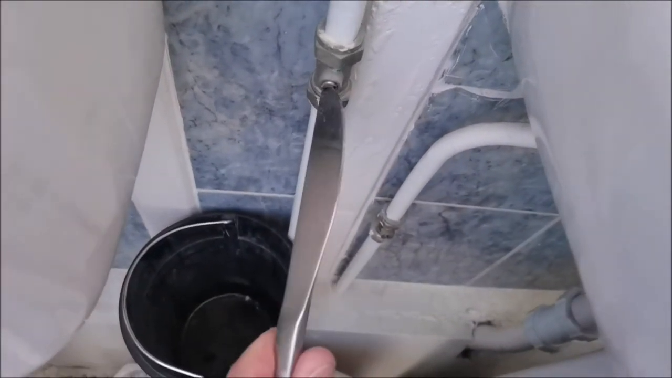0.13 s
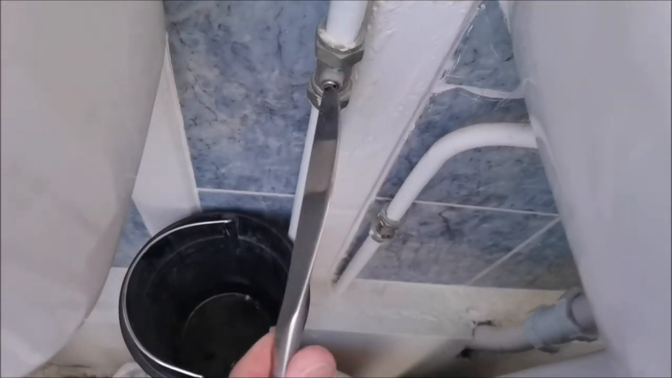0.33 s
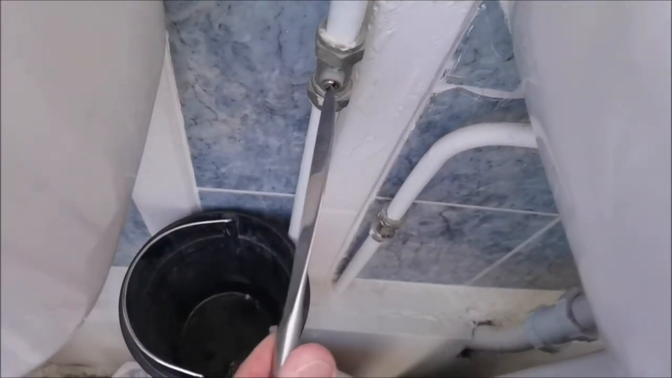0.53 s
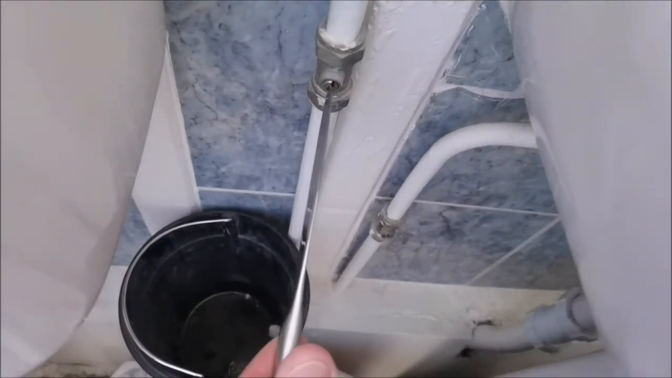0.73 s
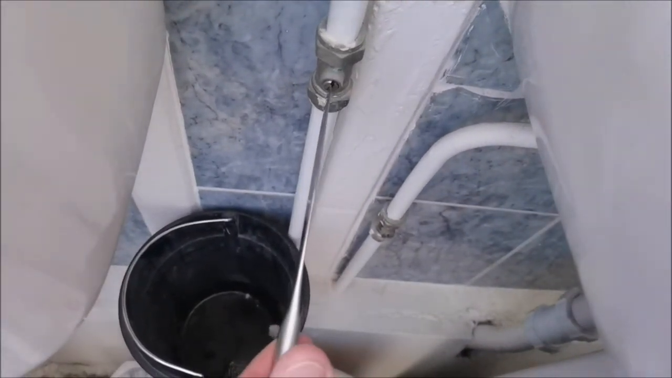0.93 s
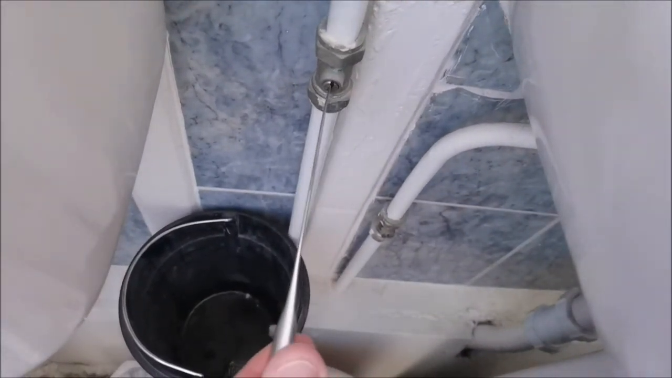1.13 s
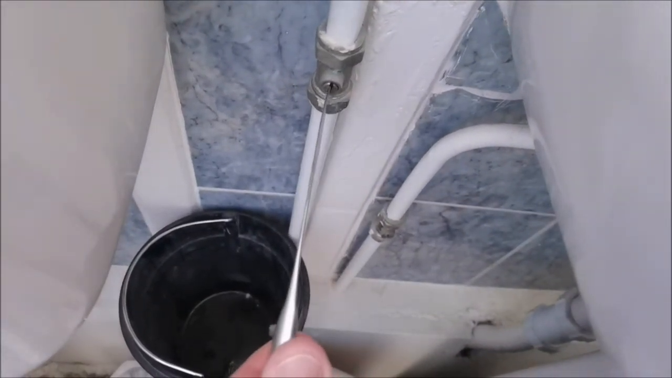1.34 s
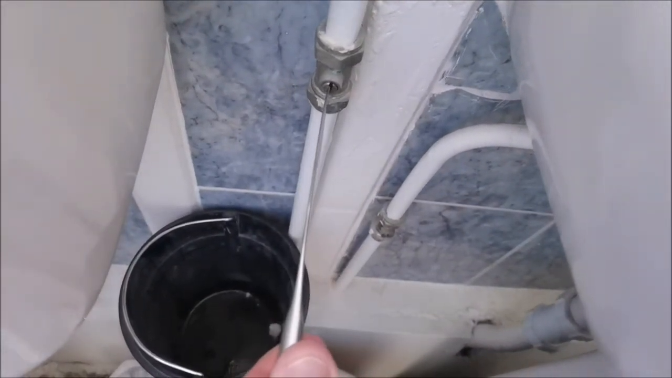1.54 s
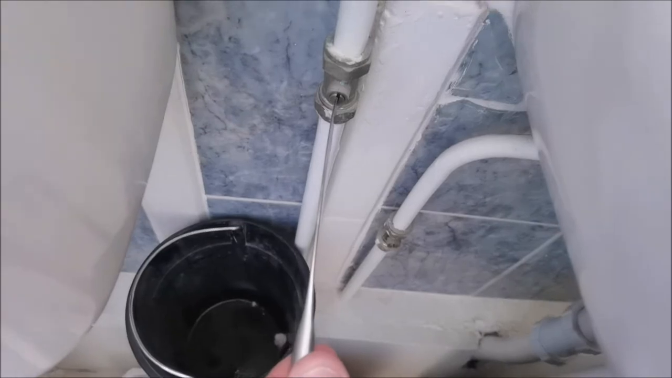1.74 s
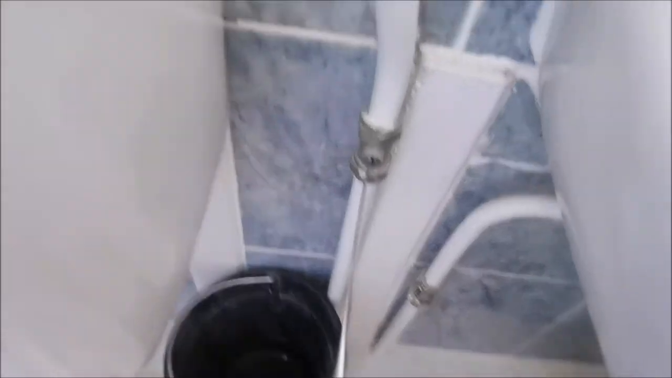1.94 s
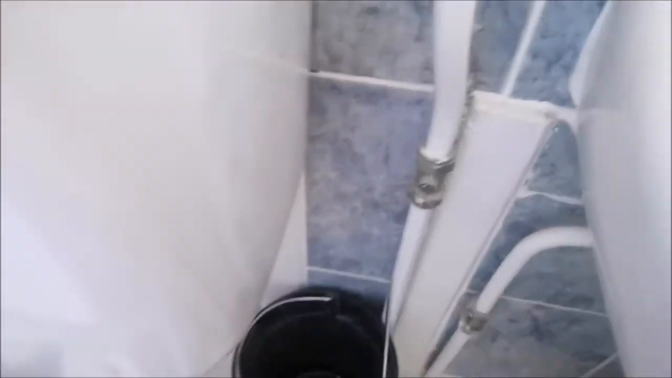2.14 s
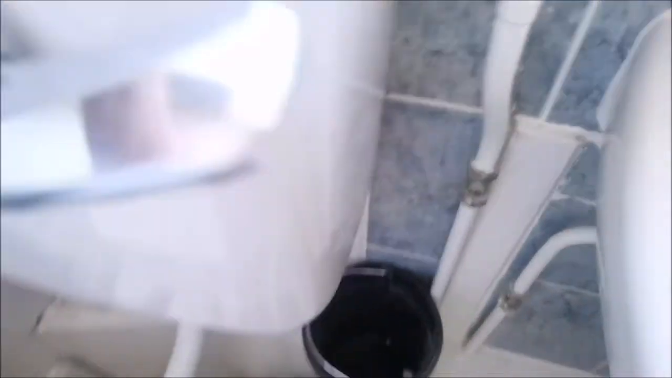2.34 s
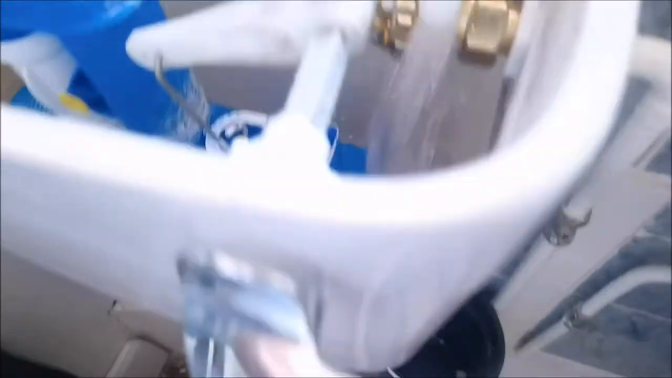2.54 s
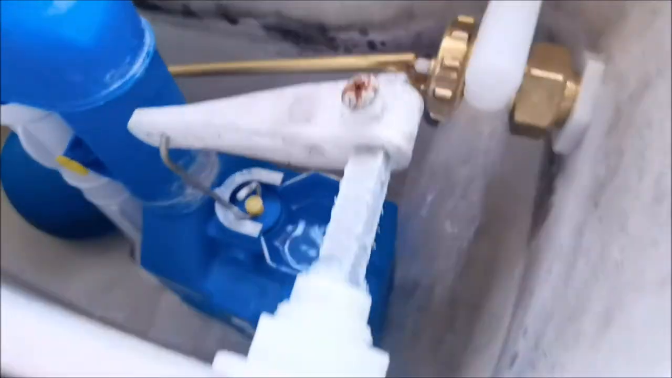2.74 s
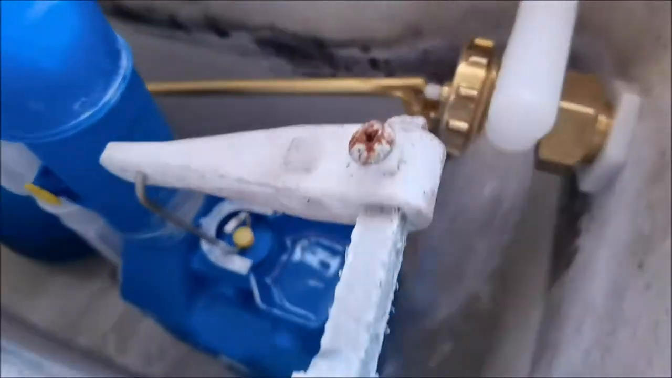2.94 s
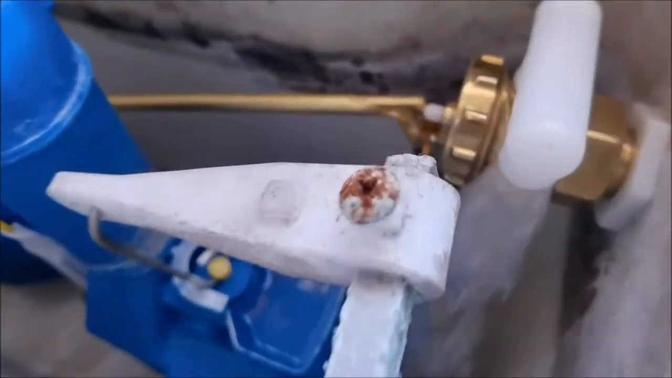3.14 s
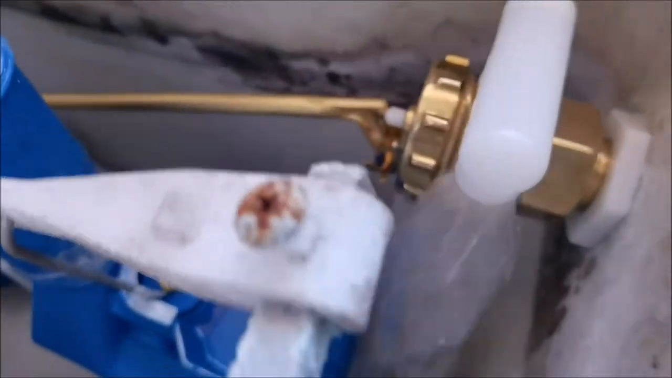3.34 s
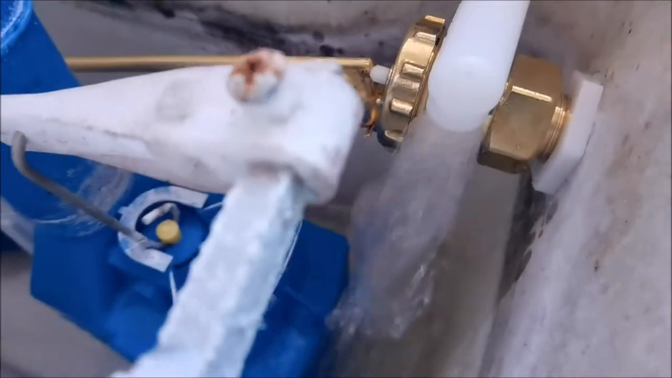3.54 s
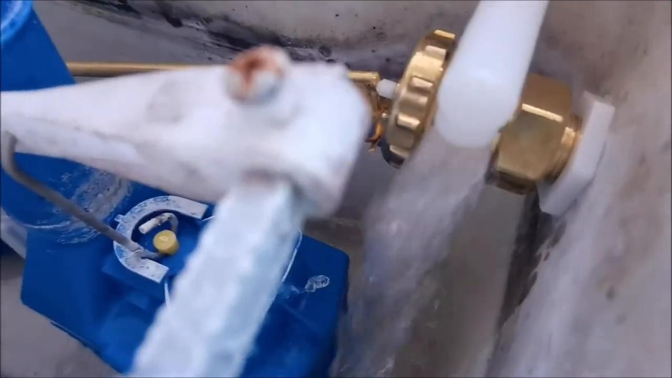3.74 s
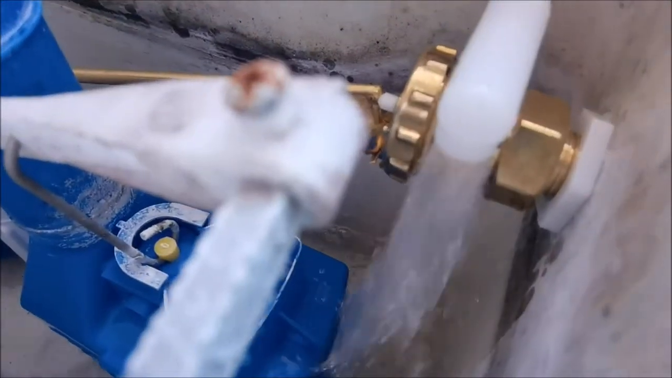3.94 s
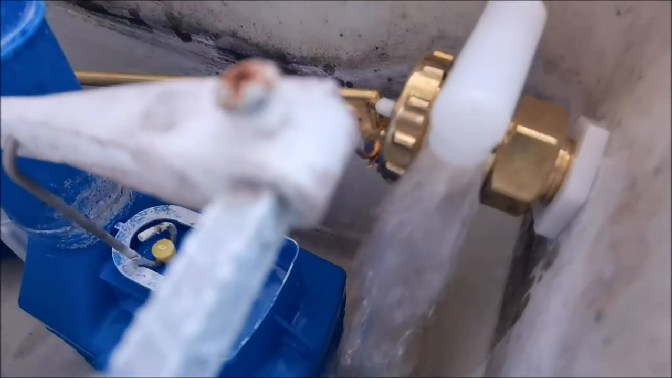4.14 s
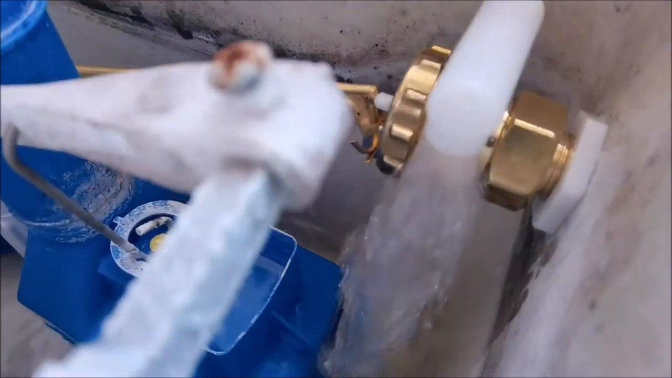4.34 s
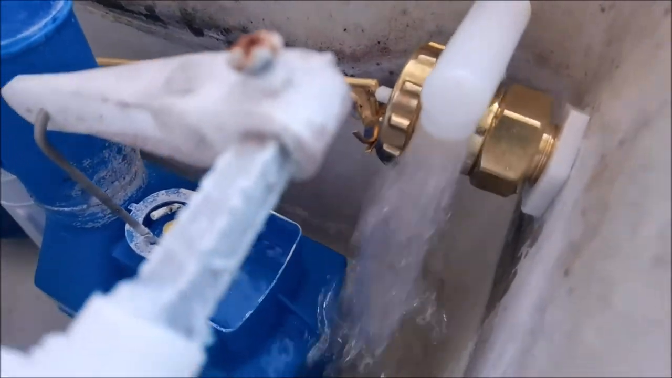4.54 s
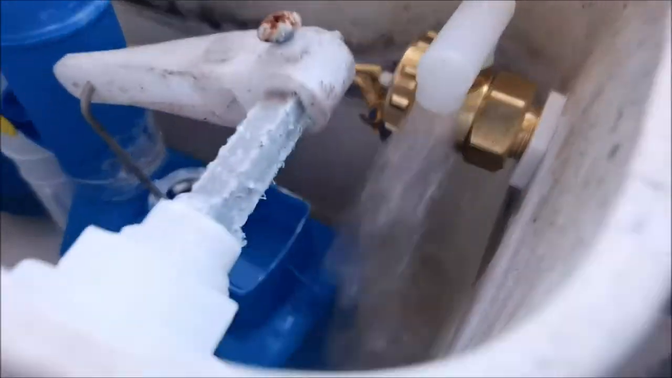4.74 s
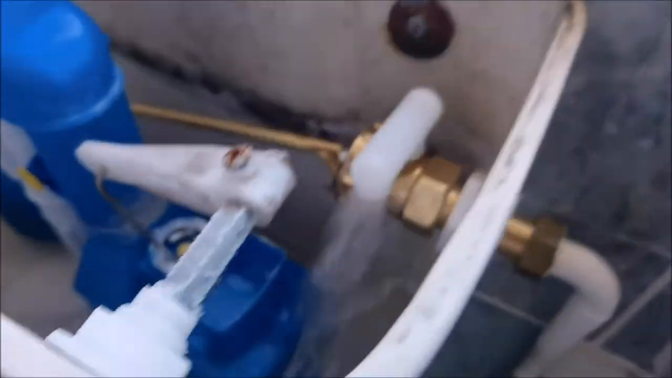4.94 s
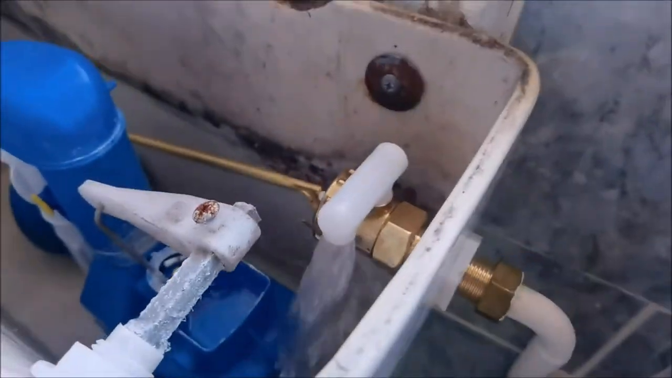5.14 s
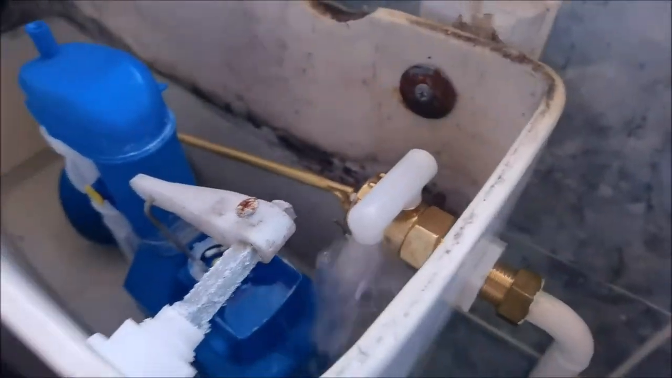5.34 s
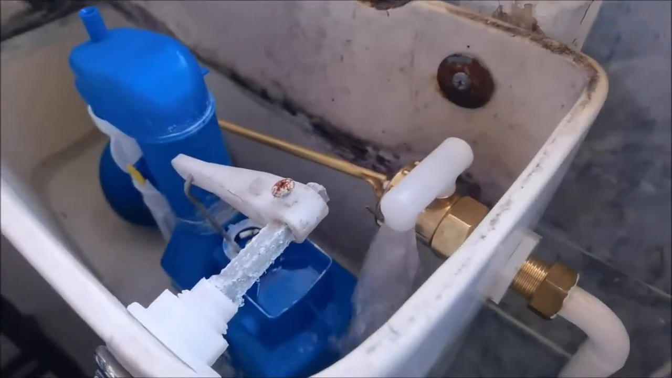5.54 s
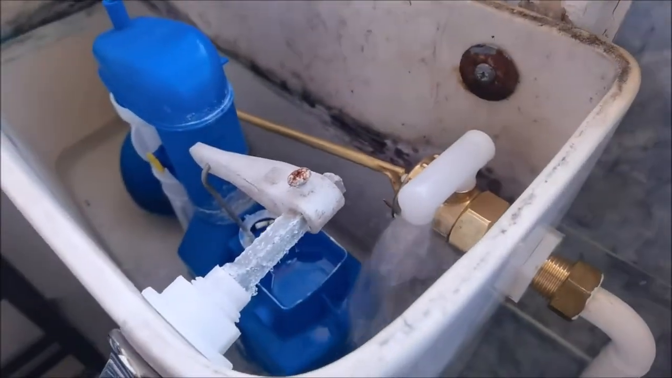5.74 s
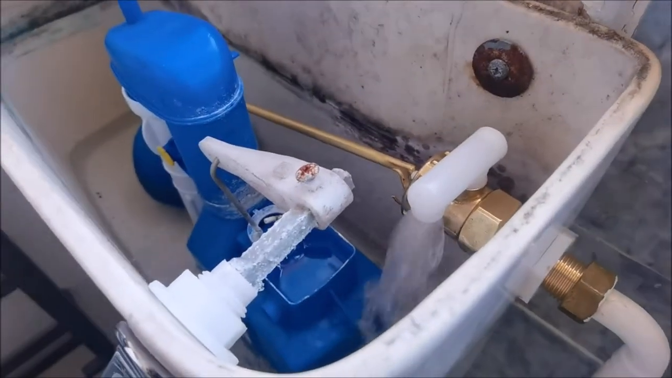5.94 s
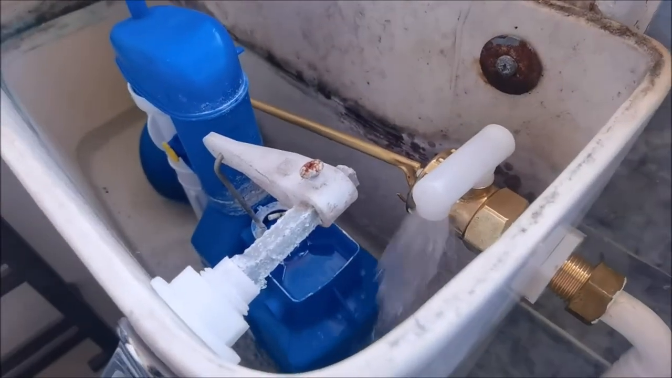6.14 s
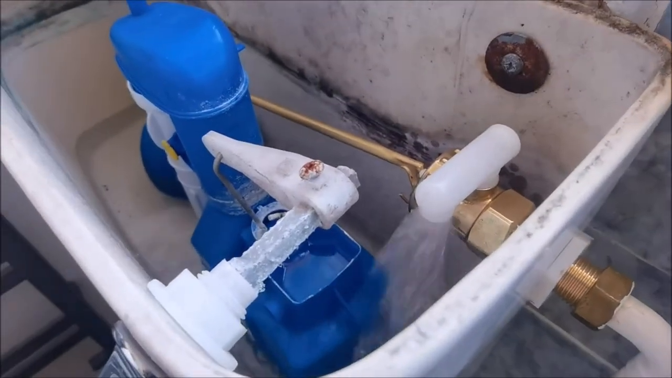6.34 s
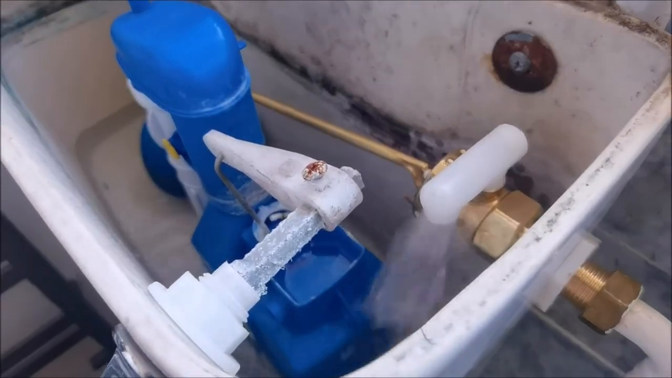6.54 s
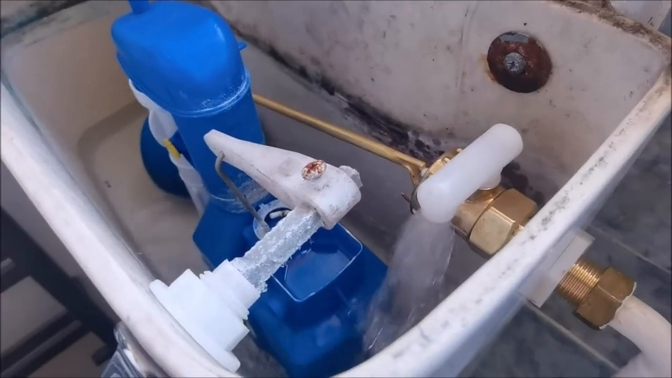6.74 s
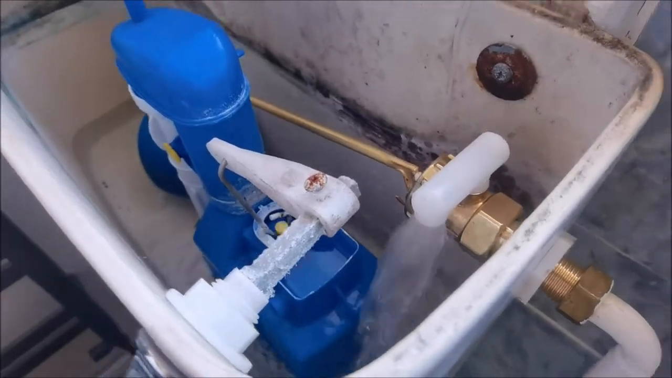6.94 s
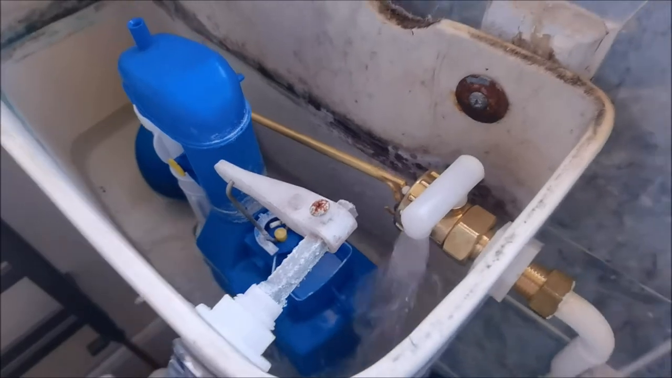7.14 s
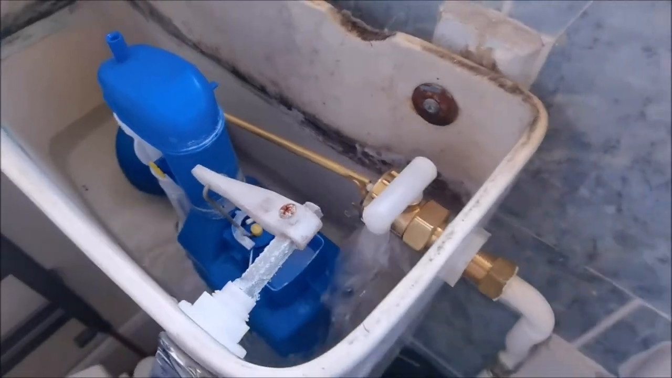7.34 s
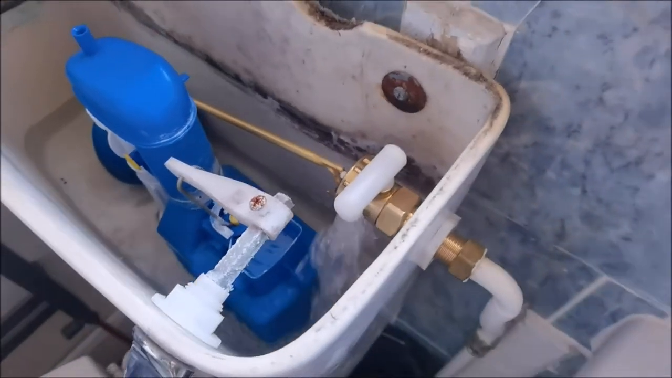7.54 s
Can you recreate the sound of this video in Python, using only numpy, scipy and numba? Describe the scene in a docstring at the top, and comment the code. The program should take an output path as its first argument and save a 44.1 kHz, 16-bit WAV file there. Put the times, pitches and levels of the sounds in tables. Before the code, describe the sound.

In a small tiled bathroom, a supply valve opens and water sputters, then hisses steadily into a toilet tank. A few glugs, a low pipe hum and a high whistle mark the start, while faint fizzing and a hollow tone sit under the rush. The close, hand-held microphone travels from the pipe up to the jet, taking two hard thumps and several softer bumps as the filling carries on.

```python
"""A plip and a brief burst of hiss, then the hiss swells: mains water is let through a stop valve and jets
from a float valve into a ceramic cistern in a small tiled room. The valve whistles, the pipe hums, a hollow
tone drifts and bubbles glug and fizz. The microphone is a hand-held phone, close in, moving from
the supply pipe up to the jet and back a little; every place has its own colour and resonances.
Knocks on the phone's body thump, and the hardest push its limiter down for a moment."""
import sys
import numpy as np
from scipy import signal
from scipy.fft import rfft, irfft
from scipy.io import wavfile
from scipy.ndimage import uniform_filter1d, map_coordinates
from numba import njit

SR = 44100
rng = np.random.default_rng(int(sys.argv[2]) if len(sys.argv) > 2 else 0)


def wrap_up_sound(samples):
    """Save the sound to the file named by the first command line argument, as 16-bit audio."""
    columns = np.atleast_2d(samples).T
    # keep every value between -1 and 1, then stretch to whole-number steps
    tamed = np.clip(columns, -1, 1)
    steps = np.round(tamed * 32767).astype(np.int16)
    wavfile.write(sys.argv[1], SR, steps)


N = 338688

# unsteady flow: (frequency [Hz], flicker spread [dB], flicker rate [1/s])
FLICKER = [(40.2, 3.5, 5.9), (119.5, 4.5, 11), (405, 2, 18), (1942, 2, 14), (6937, 0.77, 22),
           (13820, 1.1, 14)]
def water_jet():
    """Turbulent noise, coloured by the microphone's place; bands surge together and flicker alone."""
    t, hz = np.arange(N) / SR, np.maximum(np.fft.rfftfreq(N, 1 / SR), 1)
    place = mic_place(t)
    nearness = [np.clip(1 - np.abs(place - p), 0, 1) for p in range(4)]
    spectra = [place_gain(hz, p) * noise for p, noise in enumerate(port_noise(hz))]
    hiss = (hz > 4500) & (hz < 9500)  # every place gets the same power in this band
    spectra = [s * N / np.sqrt(2 * np.sum(np.abs(s.mean(0)[hiss]) ** 2)) for s in spectra]
    surge_db = .25 * wander(rate=12)
    sputter_db = .4 * wander(rate=70)  # the jet breaks up in bursts
    out = np.zeros((2, N))
    for centre in 30 * 2 ** np.arange(0, 9.8, 2 / 3):
        band = np.clip(1 - np.abs(np.log2(hz / centre)) * 3 / 2, 0, 1)
        flicker_db = over_hz(FLICKER, centre) * wander(over_hz(FLICKER, centre, column=2))
        db = flow_db(t, place, centre) + surge_db + flicker_db + sputter_db * (centre > 1000)
        out += undb(db) * sum(nearness[p] * irfft(band * spectra[p], N) for p in range(4))
    return out


# the jet's hiss at the microphone: (time [s], level [dB])
JET_LEVEL = [(0, -22.5), (.05, -40), (.17, -31.5), (.26, -26), (.45, -19), (1, -18), (1.75, -19.5),
             (2.45, -18), (3.2, -14.5), (3.6, -18), (4.1, -21), (5.6, -22.5), (6.1, -21.5), (7.1, -22.5),
             (7.68, -23)]
def flow_db(t, place, hz):
    """Level of one band: boom, splash and spray hold up while the stop valve throttles the jet."""
    def in_band(boom=0, splash=0, spray=0):
        return over_hz([(500, boom), (2800, splash), (7000, 0), (13000, spray)], hz)

    jet_db = np.interp(t, *np.transpose(JET_LEVEL))
    balance_db = in_band(boom=-4.5, splash=-4.5, spray=-2.3)
    throttled_db = np.maximum(-21 - jet_db, 0) * (place < 1)  # the valve counts as open from -21 dB
    held_db = in_band(boom=.84, splash=1.04, spray=.6) * throttled_db
    purge_db = in_band(boom=4.5, splash=4.5) * np.exp(-(t / .79) ** 2)  # air driven out of the pipe
    bass_taper = min(hz / 300, 1)  # the deepest boom falls with the jet
    spray_db = in_band(spray=4.5) * np.clip(place, 0, 1)  # comes forward away from the pipe
    return jet_db + balance_db + bass_taper * (held_db + purge_db) + spray_db


# the valve's whistle, jumping and sliding with the microphone's place: (time [s], level [dB], pitch [Hz])
WHISTLE = [(0, -36, 5900), (.7, -51, 6280), (.8, -18.5, 6490), (1.5, -21.5, 6496), (1.62, -29, 6050),
           (2.2, -23.5, 6030), (2.45, -25, 6390), (2.8, -33, 7124), (7.68, -62, 7250)]
def valve_whistle():
    """Water squeezing through the valve sings a thin, high note."""
    return noisy_tone(WHISTLE, width_hz=33)


# short clear rings (glugs, pings, one low ringing knock): (time [s], pitch [Hz], length [cycles], level [dB])
CLEAR_RINGS = [(.028, 1460, 20, -9), (.095, 2970, 160, -25), (.31, 470, 11, -22), (.56, 466, 26, -14.5),
               (.69, 455, 12, -14.5), (.885, 453.5, 18, -18), (2.648, 148, 13, -23), (3.17, 453, 14, -15.5),
               (4.85, 3710, 52, -28), (5.964, 1112, 49, -18)]
def rings_and_fizz():
    """Clear rings, and a fizz of bubbles torn under by the jet; each climbs a little, as rising bubbles do."""
    fizz_per_s, low_hz, high_hz, fizz_cycles = 90, 1919, 5504, 81
    out, chance = np.zeros((2, N)), rng.random((2048, 3))
    starts = np.cumsum(-np.log(1 - chance[:, 0])) / fizz_per_s
    fizz = [(start, low_hz * (high_hz / low_hz) ** pitch, fizz_cycles, -36 + 7.5 * (strength - .5))
            for start, (_, pitch, strength) in zip(starts[starts < N / SR], chance)]
    for start, hz, cycles, db in CLEAR_RINGS + fizz:
        length = cycles * SR / hz
        age = np.arange(int(length)) / length  # 0-1 through the ring
        envelope = 4 * age * np.exp(1 - 4 * age) * (1 - age ** 4)
        ring = envelope * np.sin(2 * np.pi * cycles * age * (1 + .014 * age))
        for port, late_s in enumerate((0, port_lag_s(start))):
            i = int((start + late_s) * SR)
            out[port, i:i + len(ring)] += undb(db) * ring[:max(N - i, 0)]
    return out


# handling, right at the microphone: (time [s], level [dB], body pitch [Hz], shell against body [dB])
KNOCKS = [(1.264, -16, 100.6, -23), (2.494, -23, 100, -35), (2.983, -37, 110, 4.5), (3.044, 2.5, 99, -2),
          (3.374, 3, 100.4, -9), (3.413, -7.5, 85, -24), (3.539, -17.5, 116, -6), (3.599, -23, 75, -19),
          (3.645, -25, 74, -13), (4.468, -27, 79.6, -14), (4.985, -33, 85, -18), (5.148, -14.5, 95, -15),
          (6.003, -28, 110, -19), (6.404, -31, 110, -21), (7.124, -23, 90.7, -14), (7.298, -27, 90, -15),
          (7.642, -34, 100, 0)]
def handling_knocks():
    """Each knock sucks the membranes out: a dull swing of the body, a quicker one of the shell, a crack."""
    out = np.zeros((2, N))
    shell_pan_db = np.array([[-6.75], [6.75]])  # towards the right port
    body_pan_db = .29 * shell_pan_db  # the dull swing shakes both ports more alike
    for start, db, body_hz, shell_db in KNOCKS:
        i = np.arange(int((start - .03) * SR), min(int((start + .2) * SR), N))
        t = i / SR - start
        body = body_hz, 6.8 / body_hz, body_pan_db
        shell = 256, .017, shell_db + shell_pan_db
        crack = 535, .0015, 9.5 + 3.4 * shell_db + body_pan_db
        for hz, t60_s, part_db in (body, shell, crack):
            rise = np.exp(-(np.minimum(t, 0) * hz / .5) ** 2)  # over half a cycle
            decay = np.exp(-np.log(1000) * np.maximum(t, 0) / t60_s)
            out[:, i] -= undb(db + part_db) * rise * decay * np.cos(2 * np.pi * hz * t)
    return out


# a faint resonance under the hiss: (time [s], level [dB], pitch [Hz])
HOLLOW = [(0, -40, 2140), (1.2, -33.5, 2240), (2, -36.5, 2290), (2.2, -32.5, 2042), (4.2, -42.5, 2006),
          (4.7, -40.5, 2092), (7.68, -33, 2180)]
def hollow_tone():
    """A hollow tone that drifts as the microphone moves and the tank fills."""
    return noisy_tone(HOLLOW, width_hz=27.6)


def pipe_hum(pitch_hz=187):
    """The pipe hums while the stop valve is being opened, then more softly until the microphone leaves."""
    levels = [(0, -65), (.41, -35), (.64, -35), (1.02, -41), (2.7, -41), (3.08, -65)]
    return noisy_tone([(time_s, db, pitch_hz) for time_s, db in levels], width_hz=10.5)


# broad colour, one list per microphone place: (frequency [Hz], level [dB])
COLOURS = [
    [(30, -12), (90, -11), (300, -18), (620, -10), (1300, -14.5), (2400, -12.5), (4400, -14), (5100, -9.5),
     (6300, -5.5), (7400, -5), (8600, -10.5), (10000, -18.5), (11900, -31), (15700, -32)],
    [(30, -22), (90, -8.5), (300, -21), (620, -11.5), (1300, -10.5), (2400, -11), (4400, -16), (5200, -5.5),
     (6100, -2), (7300, -4.5), (8300, -13), (9200, -15), (12000, -29), (15700, -27)],
    [(30, -18), (90, -13), (330, -11), (640, -18.5), (1300, -14), (2100, -8.5), (4300, -13), (5300, -8),
     (6300, -4), (7050, -2.5), (7900, -5.5), (9100, -19), (13000, -27.5), (15700, -33)],
    [(30, -18), (120, -14.5), (230, -16.5), (640, -19), (1300, -12.5), (2400, -10), (4200, -14),
     (5200, -6.5), (6600, -2), (7300, 0.5), (8000, -3), (9100, -18), (12000, -26), (15700, -34)],
]
# low resonances of pipe, tank and corner, per place: (frequency [Hz], width [Hz], level before trim [dB])
MODES_LOW = [
    [(192, 25, -7), (453, 36, -2), (730, 15, 1), (942, 25, -6.5), (1142, 19, -6), (1452, 12, 5),
     (1757, 110, -4)],
    [(181, 88, -8), (457, 32, 9), (740, 23, 5), (1140, 26, -1), (1720, 19, 2.5)],
    [(269.4, 18, -4), (465, 49.5, 1), (791, 21.4, -3.5), (1137, 22, -4.5)],
    [(274.5, 13.6, -3), (381, 15, -3), (466, 25.6, 5), (557, 8.1, -1), (715, 13.7, -5), (797, 34, -8.5),
     (1138, 28, -2), (1683, 17, -2)],
]
# high resonances, per place: (frequency [Hz], width [Hz], level before trim [dB])
MODES_HIGH = [
    [(2944, 15, -2), (3300, 100, -15), (3900, 50, -5.5), (5170, 70, -4.5), (6920, 78, -6), (9050, 83, -0.5),
     (13100, 700, -26)],
    [(3220, 220, -7), (3870, 270, -2.5), (5200, 160, 0), (5960, 220, -1.5)],
    [(3160, 220, -11.5), (3686, 53, -3.5), (5310, 36, -3), (6350, 70, 0), (7040, 65, 2.5)],
    [(2875, 50, -3.5), (3236, 102, -2), (3760, 123, -3.5), (4500, 23, -3.5), (5320, 82, -2.5),
     (6280, 130, -0.5), (7130, 100, -0.5), (13140, 440, -23.5)],
]
# stereo balance, per place: (frequency [Hz], left minus right [dB])
BALANCE = [
    [(60, -2.0), (110, -1.0), (200, 0.5), (380, 3.5), (700, 3.5), (1290, -1), (2380, -2), (4400, -0.5),
     (8120, -4.5), (15000, 7)],
    [(60, -1.0), (110, 0.5), (200, 1.5), (380, -1), (700, 2.5), (1290, -2), (2380, -0.5), (4400, -1),
     (8120, -2.5), (15000, 2)],
    [(60, -4), (110, -2), (200, 10), (380, 3), (700, 11), (1290, 1), (2380, 3), (4400, 1), (8120, 1.5),
     (15000, 5.5)],
    [(60, 0), (110, -1.5), (200, 5.5), (380, -1), (700, 2.5), (1290, 0.5), (2380, 1), (4400, -1.0),
     (8120, -1), (15000, 6)],
]
def place_gain(hz, place):
    """What each microphone port picks up at one place: broad colour plus steep-sided resonances."""
    low_trim_db, high_trim_db = (1.5, -5, -.05, -.3)[place], (.53, -4, -.2, -.7)[place]
    power = undb(2 * over_hz(COLOURS[place], hz))
    for modes, trim_db in ((MODES_LOW[place], low_trim_db), (MODES_HIGH[place], high_trim_db)):
        for mode_hz, width_hz, db in modes:
            power += undb(2 * (db + trim_db)) / (1 + ((hz - mode_hz) / width_hz) ** 2) ** 2
    side_db = over_hz(BALANCE[place], hz) / 2
    return np.sqrt(power) * undb([side_db, -side_db])


def tile_echoes(sound, patch_hz=90, patch_s=.15):
    """Echoes off tiles and porcelain make bright and dark patches that wander as the hand moves."""
    hz, t, spectrum = signal.stft(sound, SR, nperseg=1024)
    grid = np.meshgrid(hz / patch_hz, t / patch_s, indexing="ij")
    fields = rng.standard_normal((2, 512, 256))  # one for each port
    patches = np.array([map_coordinates(field, grid, order=1, mode="wrap") for field in fields])
    depth_db = 4 * np.clip(hz / 2500, 0, 1)[:, None]
    return signal.istft(spectrum * undb(depth_db * patches), SR, nperseg=1024)[1][:, :N]


# the microphone's route: (time [s], place [0 at the pipe, 1 turning, 2 over the jet, 3 above the tank])
MIC_PATH = [(0, 0), (1.55, 0.66), (1.8, 1.2), (2.2, 1.65), (2.7, 2.28), (4.3, 2), (4.7, 3), (7.68, 3)]
def mic_place(t):
    """Where the hand holds the microphone at time t, gliding between places."""
    return np.interp(t, *np.transpose(MIC_PATH))


# how much later the water reaches the right port, per place: (lag [ms])
PORT_LAG_MS = [0.267, 0.414, 0.538, 0.3995]
def port_lag_s(t):
    """Extra travel time to the right port from where the microphone is at time t."""
    return np.interp(mic_place(t), range(4), PORT_LAG_MS) / 1000


# sound common to both microphone ports: (frequency [Hz], share of power [0-1])
COHERENCE = [(60, 1), (130, 0.78), (300, 0.88), (700, 0.83), (1400, 0.55), (3000, 0), (7000, 0.64),
             (15000, 0)]
def port_noise(hz):
    """Stereo noise spectra, place by place: a shared part that reaches the right port late, plus their own."""
    shared, left, right = rfft(rng.standard_normal((3, N)))
    alike = over_hz(COHERENCE, hz)
    own = np.sqrt(1 - alike) * np.array([left, right])
    direct = hz ** 2 / (hz ** 2 + 570 ** 2)  # below 570 Hz standing waves reach both ports together
    patches = np.interp(hz / 301, np.arange(256), rng.standard_normal(256))
    scatter_rad = 4.23 * patches * np.clip(hz / 6000, 0, 1) ** 2  # echoes off nearby walls turn the phase
    for lag_ms in PORT_LAG_MS:
        delay = np.exp(-1j * (2 * np.pi * hz * lag_ms / 1000 * direct + scatter_rad))
        yield np.sqrt(alike) * np.array([shared, shared * delay]) + own


def noisy_tone(table, width_hz):
    """A narrow band of noise carried on a pitch; rows are (time [s], level [dB], pitch [Hz])."""
    t, hz = np.arange(N) / SR, np.fft.fftfreq(N, 1 / SR)
    times, db, pitches = np.transpose(table)
    pitch_hz = np.interp(t, times, pitches)
    lowpass = 1 / (1 + (hz / width_hz) ** 2)
    shared, left, right = np.fft.ifft(np.fft.fft(rng.standard_normal((3, N))) * lowpass).real
    phase = 2 * np.pi * np.cumsum(pitch_hz) / SR
    port_phases = np.array([phase - .015, phase - 2 * np.pi * pitch_hz * port_lag_s(t)])
    tone = shared * np.cos(port_phases) + np.array([left, right]) * np.sin(port_phases)
    return tone / tone.std() * undb(np.interp(t, times, db))


def wander(rate):
    """Random levels held 1 / rate s and smoothed twice; spread 1."""
    hold = max(int(SR / rate), 2)
    steps = np.repeat(rng.standard_normal(1024), hold)[:N]
    smooth = uniform_filter1d(uniform_filter1d(steps, hold), hold)
    return np.pad(smooth, (0, N - len(smooth)), "wrap") / smooth.std()


def over_hz(table, hz, column=1):
    """Read a table on a log-frequency axis."""
    table = np.array(table, float)
    return np.interp(np.log(hz), np.log(table[:, 0]), table[:, column])


def undb(db):
    """dB to gain."""
    return 10 ** (np.asarray(db) / 20)


def scene():
    """Water, tones, rings and fizz reach the microphone through the room; handling reaches it directly."""
    tones = hollow_tone() + valve_whistle() + pipe_hum()
    return tile_echoes(water_jet() + tones + rings_and_fizz()) + handling_knocks()


@njit
def limiter(peak, ceiling, attack_s, release_s):
    """Gain that drops fast when the peak passes the ceiling and comes back slowly."""
    gains, gain = np.empty(len(peak)), 1.
    for i in range(len(peak)):
        target = min(1., ceiling / (peak[i] + 1e-9))
        gain += (target - gain) / (SR * (attack_s if target < gain else release_s))
        gains[i] = gain
    return gains


def record(dry):
    """The phone: a bass cut, one look-ahead limiter for both ports, clipping, then a steep treble cut."""
    bass_cut = signal.sosfilt(signal.butter(2, 69.6, "high", fs=SR, output="sos"), dry)
    ahead = int(.0023 * SR)
    peak = np.pad(np.abs(bass_cut).max(0)[ahead:], (0, ahead))
    gain = limiter(peak, ceiling=float(undb(-5)), attack_s=.0003, release_s=.2)
    clipped = np.clip(bass_cut * gain, -.95, .95)
    return signal.sosfilt(signal.ellip(14, .3, 70, 15720, fs=SR, output="sos"), clipped)


dry = scene()
out = record(dry)
wrap_up_sound(out)
```